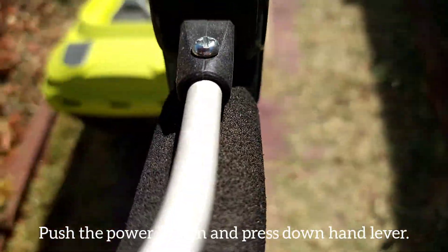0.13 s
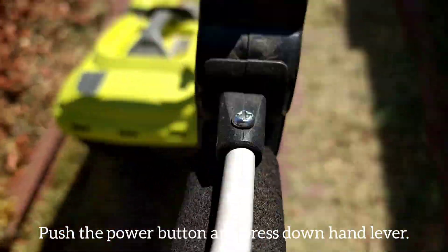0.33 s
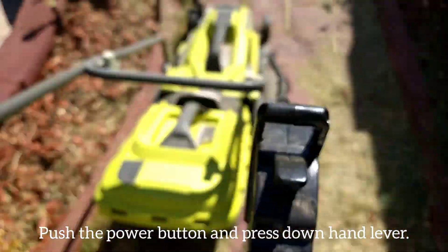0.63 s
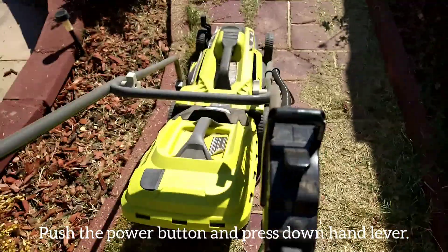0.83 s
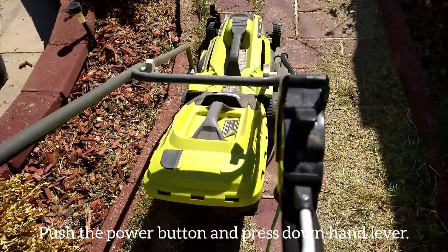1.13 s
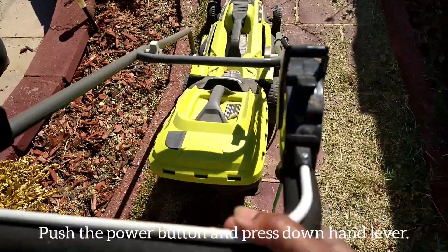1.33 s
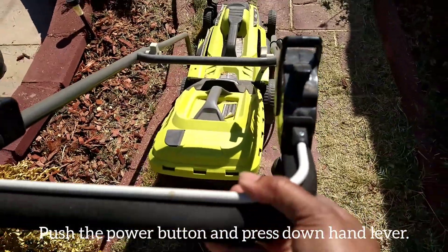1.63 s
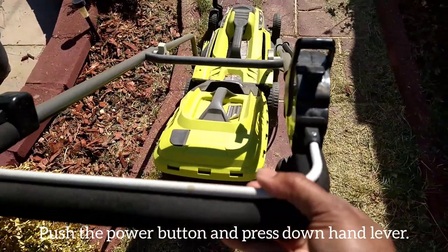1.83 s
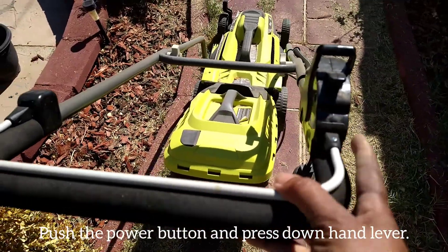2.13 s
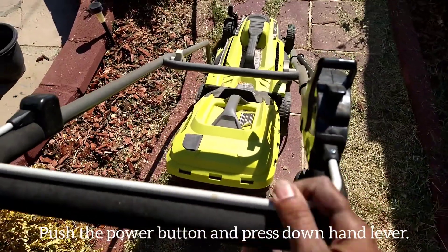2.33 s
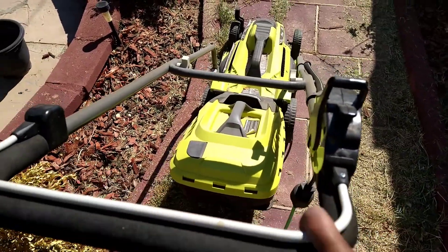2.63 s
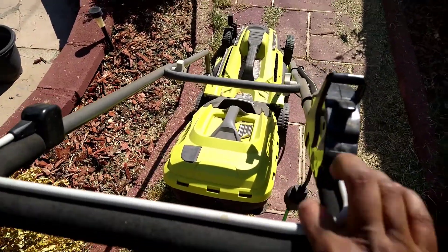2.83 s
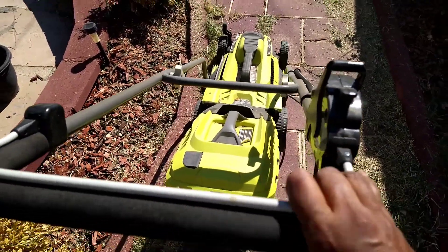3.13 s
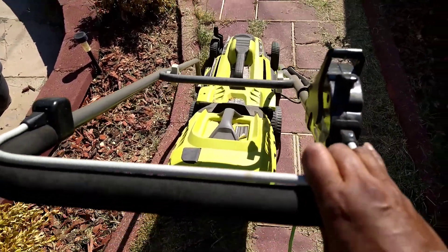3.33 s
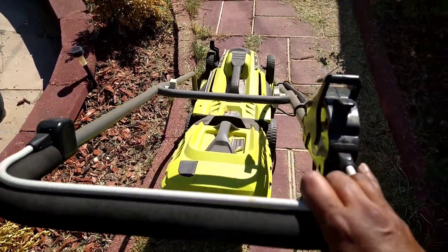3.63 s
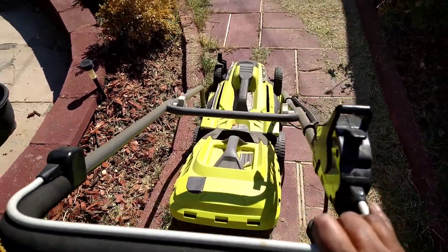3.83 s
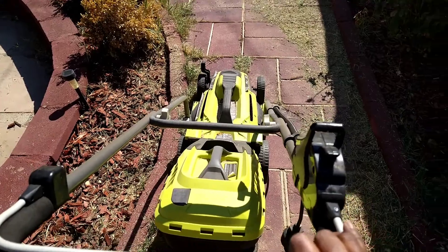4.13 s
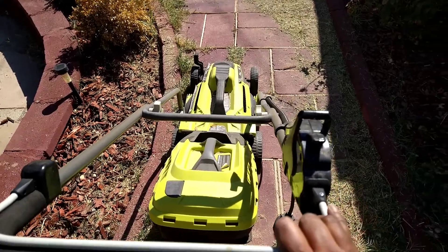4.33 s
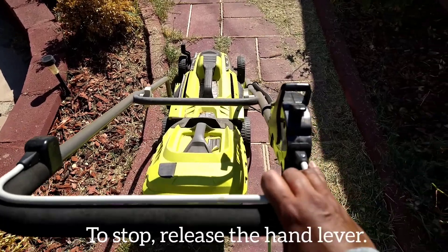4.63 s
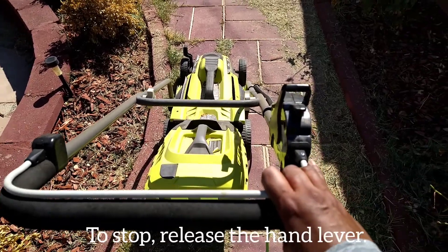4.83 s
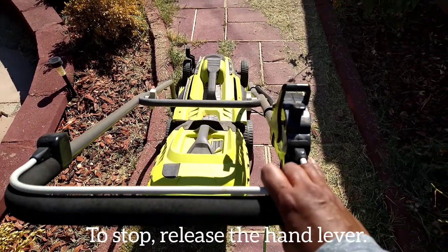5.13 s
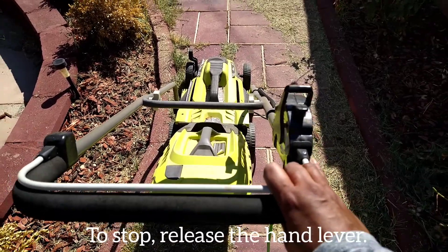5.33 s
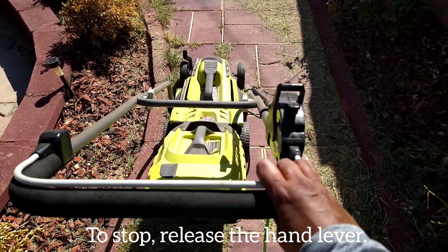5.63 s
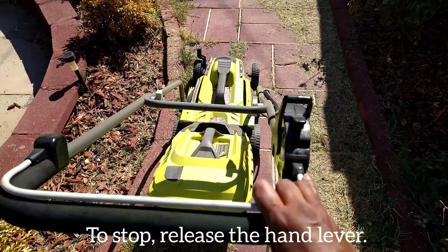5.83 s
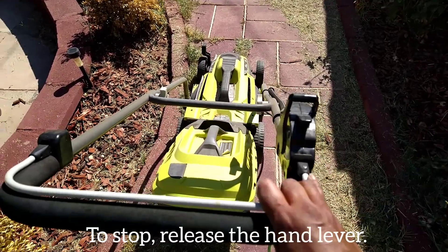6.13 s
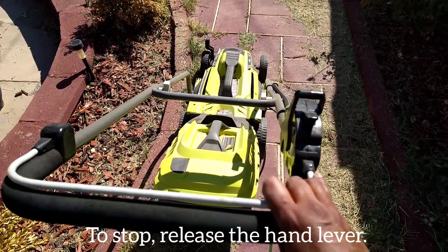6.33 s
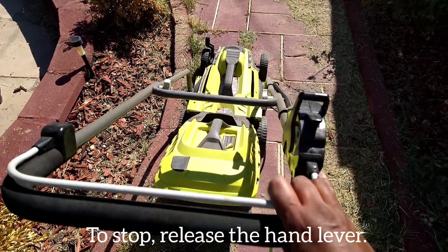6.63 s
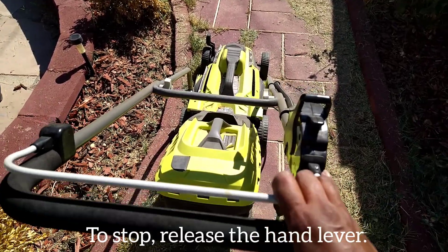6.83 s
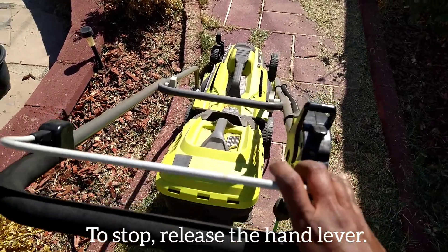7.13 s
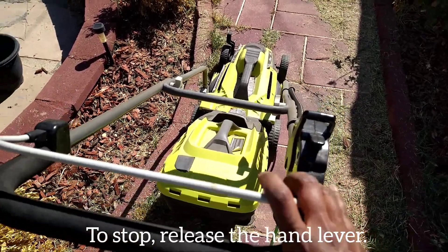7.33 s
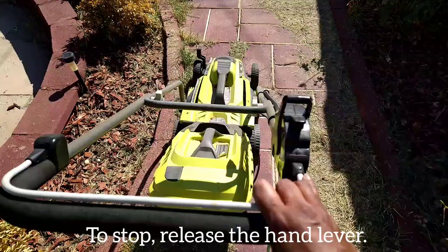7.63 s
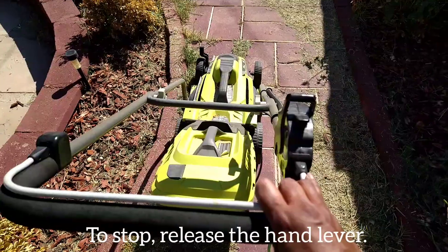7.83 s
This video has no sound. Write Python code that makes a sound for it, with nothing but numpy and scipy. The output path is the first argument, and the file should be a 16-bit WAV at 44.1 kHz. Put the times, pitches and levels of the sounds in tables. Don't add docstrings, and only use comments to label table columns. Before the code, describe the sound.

Outdoors on paving, a small electric lawn mower is heard close from the handle in stereo. At 0 s it is already spinning, rising the last bit to full speed within about a second. It then holds a steady, fast drone: motor hum and low blade beating near 120 Hz, turbulent roar and hiss, a shrill belt whine and a thin steel ring near 3.9 kHz. Timbre and balance shift as the microphones move; from 3 to 5.7 s it is somewhat softer. Dry plastic ticks fall around 1.1, 1.5, 1.65 and 3.7 s, fainter later. At 5.7 s the sound cuts hard for nearly a quarter second, then returns quickly, fuller. At 6.93 s the lever springs open with a sharp double clack; the motor coasts, pitch sinking, whine and ring fading. A second dropout comes at 7.57 s, lasting until about 7.78 s.

```python
import sys
import numpy as np
from scipy import signal
from scipy.io import wavfile
from scipy.ndimage import uniform_filter1d

SR = 44100
rng = np.random.default_rng(int(sys.argv[2]) if len(sys.argv) > 2 else 0)


def transcribe(u):
    v = np.clip(np.atleast_2d(u).T, -1, 1)
    q = np.round(v * 32767).astype(np.int16)
    wavfile.write(sys.argv[1], SR, q)


def volts_from_db(level):
    exponent = np.asarray(level, float) / 20
    return 10 ** exponent


N = 352359


def read(points, hz):
    f, value = np.transpose(points)
    return np.interp(np.log(hz + 1), np.log(f + 1), value)


def curves(table, t):
    s, *columns = np.transpose(table)
    return [np.interp(t, s, c) for c in columns]


def evened(x):
    return x / np.sqrt(np.mean(abs(x) ** 2) + 1e-20)


def drift(rate_hz):
    t = np.arange(0, N + 256, 256) / SR
    slow = 0
    for f in np.geomspace(rate_hz / 8, rate_hz, num=16):
        slow = slow + np.sin(2 * np.pi * (f * t + rng.random())) / np.sqrt(f)
    return np.interp(np.arange(N) / SR, t, evened(slow))


def tone(turns, db, waver_db, blur_rad, rate_hz):
    angle = 2 * np.pi * (turns + rng.random()) + blur_rad * drift(rate_hz)
    return np.sqrt(2) * volts_from_db(db + waver_db * drift(rate_hz)) * np.exp(1j * angle)


def placed(z, pan_db, lead_rad):
    half = volts_from_db(pan_db / 2) * np.exp(.5j * lead_rad)
    mean_power = (abs(half) ** 2 + abs(half) ** -2) / 2
    return np.array([z * half, z / half]).real / np.sqrt(mean_power)


def resonate(x, hz, width_hz):
    turn = np.exp(2j * np.pi * np.cumsum(hz * np.ones(N)) / SR)
    r = np.exp(-np.pi * width_hz / SR)
    return turn * signal.lfilter([1 - r], [1, -r], x / turn)


# t/s, f/Hz
SPEED = [(0, 333.7), (1, 334.2), (1.5, 334.5), (2.3, 335.9), (3.25, 335.8), (4, 334.8), (4.6, 334.7),
         (5.7, 333.3), (5.95, 331.6), (6.94, 330.8), (7.78, 331.75)]
START_SHORT_HZ, SPIN_UP_S = 18.8, .31
COAST_FROM_S, DRAG_PER_S, DRAG_POWER = 6.938, .66, .4


def shaft(t):
    running = curves(SPEED, t)[0] - START_SHORT_HZ * np.exp(-t / SPIN_UP_S)
    free_s = np.maximum(t - COAST_FROM_S, 0) * (t < GAPS[1][1] - .1)
    slowed = (1 + DRAG_POWER * DRAG_PER_S * free_s) ** (-1 / DRAG_POWER)
    return running * slowed, np.log2(slowed)


# t/s, distance level/dB, farness [0-1], paving echo delay/ms,
# turn of the pair [0-1], aim at the deck [0-1]
STANCE = [(0, -1.6, 0.03, 2.77, 0.3, 0.03), (.4, -0.45, 0.02, 3.7, 0.25, 0), (.7, 0.6, .05, 3.7, 0.5, 0.7),
          (1.15, 0, 0, 3.6, 0.25, 0.67), (1.5, 0, 0.24, 3.4, 0.04, 0.44), (2, 0.5, 0.4, 2.66, 0, 0.45),
          (2.5, 0.5, 0.24, 2.8, 0, 0.62), (2.85, -1, 0.45, 2.4, 0, 0.5), (3.05, -2, 0.69, 2.5, 0, 0.6),
          (3.35, -2, 0.93, 1.9, 0, 0.7), (3.7, -4, 0.78, 1.3, 0.6, 0.52),
          (4.2, -4.5, 0.77, 0.55, 0.5, 0.52), (4.8, -5.5, 0.72, 1.47, 1.05, .2), (5.7, -6, .6, 1, 1, 0.06),
          (5.95, 0.4, 0.43, 2.2, 0.5, 0.28), (6.95, 0.2, 0.34, 2.74, 0.68, 0.12),
          (7.57, 0.9, 0.63, 3, 0.9, 0), (7.78, -0.2, 0.39, 2.4, 0.55, 0)]
LOAD_S = 0.8


def level(layer, t):
    db, share, strain_db, per_octave_db, aimed_db = layer
    lost_db, *_, aim = curves(STANCE, t)
    strain_db = strain_db * np.exp(-(t / LOAD_S) ** 2)
    return db + share * lost_db + strain_db + per_octave_db * shaft(t)[1] + aimed_db * aim


ECHO, AIR_ECHO, ECHO_TOP_HZ = 0.2, 0.1, 1200


def paving(hz, t, strength):
    g = np.clip(strength, 0, .9) / (1 + (hz / ECHO_TOP_HZ) ** 4)
    delay_s = curves(STANCE, t)[2] / 1000
    return 10 * np.log10((1 + g ** 2 + 2 * g * np.cos(2 * np.pi * hz * delay_s)) / (1 + g ** 2))


LEADS = [(-2, 0.8), (0, 1.3), (0.8, 1.28)]


def pair_lead(row, t):
    start, growth = LEADS[row]
    return start + growth * curves(STANCE, t)[3]


POWER_OFF_S = 6.95


def current_off_db(t):
    return -9 * np.clip((t - POWER_OFF_S) / .04, 0, 1) * (t < GAPS[1][0])


# level/dB, share of distance loss, start strain/dB, speed law/dB per octave, aim/dB
HUM = (-26, 0.86, 0, -5.2, 0.9)
SHAFT_ORDERS = (2, 13, 15)
MOTOR_ORDERS = (-15, -30.5, -37)


def shaft_hum(t, hz, turns):
    hum_db = level(HUM, t) + paving(hz, t, ECHO)
    hum = tone(turns, hum_db, 0.25, 0.54, 8.1)
    for order, db in zip(SHAFT_ORDERS, MOTOR_ORDERS):
        hum += tone(order * turns, hum_db + db, 3.3, 0.31, 19)
    return placed(hum, .8, -0.37)


BRUSHES = (-38.5, 1.3, 3.5, -5, -2.5)
SIZZLE = (-37.5, 1.5, 10.5, 13, -8.5)
BARS, SIZZLE_WIDTH_HZ = 16, 1500


def commutator(t, hz, turns):
    bars = tone(BARS * turns, level(BRUSHES, t) + 1 + current_off_db(t), 0.68, .5, 21)
    sizzle = evened(resonate(rng.standard_normal((2, N)), BARS * hz, SIZZLE_WIDTH_HZ).real)
    return placed(bars, .6, pair_lead(0, t)) + volts_from_db(level(SIZZLE, t)) * sizzle


# t/s, level/dB, L-R/dB
WHINE = [(0, -40, 13), (.15, -28, 9), (.35, -37, 2), (1, -39, 10), (1.4, -41.5, 18), (1.8, -36, 14),
         (2.4, -39.5, 13), (2.85, -34.5, 14), (3.1, -43, 2), (3.3, -42, -10), (3.6, -29.5, 7),
         (4.2, -32.5, 13), (4.6, -36, -3), (5.05, -32.5, -13.5), (5.7, -28.5, 1.5), (5.95, -27.5, 3.5),
         (6.9, -27.5, -8), (7.78, -27.5, 2.5)]
WHINE_STEPS = (-4, -3, -2, -1, 1, 2, 3, 4)
WHINE_SIDES = (-15, -14.5, -27, -26.5, -11, -8, -19.5, -11.5)
TEETH, PASS_PER_TURN = 22, .3655
WHINE_PER_OCT_DB = 33
WHINE_OFF_SHARE = .75


def belt_whine(t, turns):
    whine_db, pan_db = curves(WHINE, t)
    whine_db = whine_db + WHINE_PER_OCT_DB * shaft(t)[1]
    off_db, lead = current_off_db(t), pair_lead(1, t)
    whine = tone(TEETH * turns, whine_db + WHINE_OFF_SHARE * off_db - .6, 0.88, .3, 25)
    sides_db = -34.5 + 0.22 * (whine_db + 25.5) + off_db
    sides = 0
    for k, db in zip(WHINE_STEPS, WHINE_SIDES):
        sides = sides + tone((TEETH + k * PASS_PER_TURN) * turns, db + sides_db, 1.2, 0.27, 7.5)
    return placed(whine, pan_db, lead) + placed(sides, 0.4 * pan_db, .5 * lead)


def motor(t, hz):
    turns = np.cumsum(hz) / SR
    return shaft_hum(t, hz, turns) + commutator(t, hz, turns) + belt_whine(t, turns)


MULTIPLES = (1, 2, 3, 4, 7)
# level/dB, share of distance loss, start strain/dB, speed law/dB per octave, aim/dB
BEATS = [
    (-27, 1.66, 2, 26, -6.5),
    (-29.5, 1.5, 10, 17, 1.5),
    (-25.5, 0.77, 2, 9.2, -2),
    (-27.5, 0.68, -14.5, 47, -2.2),
    (-37, 3.2, 4.5, 0.091, -11.5),
]
UPPER = (.5, 4.5, 5, 6, 8, 9, 11, 13.33)
UPPER_DB = (-28.5, -14, -6, -16, -18, -22, -22, -26)


def blade_beats(t, shaft_hz, passes):
    def heard_db(layer, multiple):
        return level(layer, t) + paving(multiple * PASS_PER_TURN * shaft_hz, t, ECHO)

    thump = tone(passes, heard_db(BEATS[0], MULTIPLES[0]), 0.23, .1, 6)
    beat = 0
    for k, layer in zip(MULTIPLES[1:], BEATS[1:]):
        beat = beat + tone(k * passes, heard_db(layer, k) - .6, 0.53, 0.24, 16)
    for k, db in zip(UPPER, UPPER_DB):
        beat = beat + tone(k * passes, heard_db(BEATS[3], k) + db, 2.8, 0.22, 14)
    return placed(thump, -.3, 0.55) + placed(beat, -.4, -.1)


# t/s, level/dB, L-R/dB
RING = [(0, -25.5, 8), (.3, -24, 3.5), (.6, -27.5, -3.5), (1.2, -28.5, 11.5), (1.55, -23, 1.5),
        (2.1, -24.5, -6), (2.8, -24, 6.5), (3.3, -27, -2), (3.8, -28.5, -37), (4.1, -25.5, -19.5),
        (4.6, -33, 6.5), (5.3, -37.5, 1.5), (5.7, -34.5, 4.5), (5.95, -32.5, 6), (6.3, -27.5, 13),
        (6.9, -28.5, 12), (7.57, -25, 13.5), (7.78, -31, -0.5)]
RING_STEPS = (-3, -2, -1, 1, 2, 3, 4)
RING_SIDES = (-25, -23, -19, -13, -21, -25, -27)
# width/Hz, level/dB re the ring
HUMPS = [(90, -12.5), (330, -7.5), (900, -9.5)]
RING_HOLD_OCT, RING_PER_OCT_DB = .14, 85
TWIN_HZ, TWIN_DB = -57, -13


def blade_ring(t, shaft_hz, passes):
    ring_db, pan_db = curves(RING, t)
    ring_db = ring_db + RING_PER_OCT_DB * np.minimum(shaft(t)[1] + RING_HOLD_OCT, 0)
    hz = 3890 + .9 * (shaft_hz - 335)
    turns = np.cumsum(hz) / SR
    ring = tone(turns, ring_db - 0.75, .7, 0.5, 25)
    ring += tone(turns + TWIN_HZ * t, ring_db + TWIN_DB, 3, .9, 25)
    sides = 0
    for k, db in zip(RING_STEPS, RING_SIDES):
        sides = sides + tone(turns + k * passes, ring_db + db, 0.67, 0.31, 18)
    noise = rng.standard_normal((2, N))
    noise[1] = .6 * np.roll(noise[0], -19) + .8 * noise[1]
    halo = 0
    for width_hz, db in HUMPS:
        once = resonate(noise, hz, width_hz).real
        halo = halo + volts_from_db(ring_db + db) * evened(resonate(once, hz, width_hz).real)
    return placed(ring, pan_db, pair_lead(2, t)) + placed(sides, .3 * pan_db, .3) + halo


# f/Hz, level/dB per Hz
NEAR = [(40, -20), (110, -21), (170, -0.5), (300, 3), (600, -11.5), (1000, -14.5), (2300, -16.5),
        (3300, -16), (5800, -16), (8300, -13), (9500, -22.5), (11000, -24.5), (13600, -25.5),
        (15700, -30.5)]
# f/Hz, level/dB per Hz
FAR = [(40, -37.5), (110, -28), (170, -13.5), (300, -1.5), (650, 3), (1200, -12), (2200, -23.5),
       (3300, -38), (6200, -23), (7400, -19.5), (8500, -25), (11000, -30), (13600, -30.5), (15700, -43)]
# f/Hz, width/Hz, level/dB at most
DECK = [(956, 160, -16.5), (1820, 70, -7), (1840, 48, 20.5), (2150, 49, 7), (2220, 80, -10), (2940, 76, 13),
        (4170, 200, -13)]
# f/Hz, width/Hz, level/dB per octave of speed
BELT_HISS = (7700, 600, 12)
# f/Hz, width/Hz, level/dB
NOTCH = (1150, 130, -2.5)
# lower f/Hz, upper f/Hz
AIR_BANDS = [(130, 800), (850, 1400), (1500, 6800), (8000, 15000)]
# level/dB, share of distance loss, start strain/dB, speed law/dB per octave, aim/dB
RUSH = [
    (-25, 0.94, -0.3, 7.9, .2),
    (-27.5, .9, 4.5, 12.6, .2),
    (-23.5, 0.54, -5.5, 9, 0.7),
    (-33, 0.84, -1.5, 17, 3.5),
]
FAR_DULL_DB = (3.1, -8, -1, -8.5)


def air_spectrum(hz, t):
    _, far, _, _, aim = np.clip(curves(STANCE, t), 0, 1)
    hz = hz[:, None]

    def bump(at_hz, width_hz):
        return np.exp(-((hz - at_hz) / width_hz) ** 2)

    shape = read(NEAR, hz) * (1 - far) + read(FAR, hz) * far
    shape += 5 * bump(13600, 600) - (7 - 5 * far) * bump(11100, 400)
    for at_hz, width_hz, db in DECK:
        shape += db * far * aim * bump(at_hz, width_hz)
    shape += BELT_HISS[2] * shaft(t)[1] * bump(*BELT_HISS[:2])
    shape += NOTCH[2] * bump(*NOTCH[:2])
    lifts = []
    for layer, dull_db, (lo, hi) in zip(RUSH, FAR_DULL_DB, AIR_BANDS):
        inside = (hz[:, 0] > lo) & (hz[:, 0] < hi)
        band_power = (volts_from_db(shape[inside]) ** 2).sum(0)
        lifts.append(level(layer, t) + dull_db * far - 10 * np.log10(band_power))
    centres = np.log([np.sqrt(lo * hi) for lo, hi in AIR_BANDS])
    for one, lift_db in zip(np.eye(4), lifts):
        shape += np.interp(np.log(hz + 1), centres, one) * lift_db
    return shape + paving(hz, t, AIR_ECHO)


# f/Hz, lead of the left/rad
LEAD = [(0, 0), (600, -0.2), (1030, -0.7), (1380, 0.2), (1810, -4.9), (2150, -5.8), (2760, -7.0),
        (4050, -12.4), (6890, -17.7), (9220, -25.6), (10900, -28.4), (11600, -30.7), (14800, -41.3),
        (15300, -43.9)]
# f/Hz, likeness [0-1]
SAME = [(60, .9), (300, .97), (600, .8), (1000, .2), (1700, .45), (2400, .9), (3500, .65), (7000, .7),
        (9900, .25), (12000, .55), (14500, .55), (15500, .95)]
# f/Hz, L-R/dB
LEFT = [(60, -6.5), (99, 8), (160, 4.5), (270, -5), (450, 0.5), (740, -3), (1220, -2), (2010, -5.5),
        (3330, 9.5), (5500, -1), (9080, 2.5), (15000, 3)]


def air(passes):
    frames, hz = N // 256 + 5, np.fft.rfftfreq(1024, 1 / SR)
    t = np.arange(frames) * 256 / SR
    turn = np.clip(curves(STANCE, t)[3], 0, 1)
    a, b, c, d, patches = rng.standard_normal((frames, 513, 5)).T
    patches = uniform_filter1d(uniform_filter1d(patches, 8, axis=0), 30, axis=1)
    right, other = a + 1j * b, c + 1j * d
    same = np.clip(read(SAME, hz), -1, 1)[:, None]
    lead = np.interp(hz, *np.transpose(LEAD))[:, None] * (1.03 - .09 * turn)
    z = np.array([right * np.exp(1j * lead), same * right + np.sqrt(1 - same ** 2) * other])
    tilt = volts_from_db(read(LEFT, hz) / 2)[:, None]
    z *= np.array([tilt, 1 / tilt]) * volts_from_db(air_spectrum(hz, t) + 1.58 * evened(patches) + 0.55)
    low = (1 / (1 + (hz / 1200) ** 4))[:, None]
    roar = signal.istft(z * low, nperseg=1024, noverlap=768)[1][:, :N]
    hiss = signal.istft(z * (1 - low), nperseg=1024, noverlap=768)[1][:, :N]
    throb = 0.055 * np.cos(2 * np.pi * passes)
    throb += 0.092 * np.cos(4 * np.pi * passes + 2.6)
    throb += 0.085 * np.cos(6 * np.pi * passes + 0.88)
    return roar * (1 + 0.38 * throb) + hiss * (1 + throb)


# t/s, peak level/dB, brightness f/Hz, L-R/dB
TICKS = [(1.0559, -11, 9020, 5), (1.4526, -16.5, 9120, 10.5), (1.65, -8.5, 8900, 1.5),
         (2.4262, -22, 8970, 4.5), (3.649, -16.5, 8880, -2.2), (3.683, -13.5, 6000, 6.5),
         (3.717, -21.5, 8660, 6.5), (3.766, -22, 11000, 12.5), (3.8999, -23, 11000, -3.5),
         (5.189, -24, 9000, -3.5), (5.3536, -23.5, 9040, -5.5), (5.5666, -19, 8930, -4.5),
         (6.4506, -24, 8950, -1), (6.713, -15, 8770, 4.5)]
LEVER = [
    (6.9327, -8, 11000, 3),
    (6.9336, -3, 5200, 3),
    (6.9385, -13, 5000, 1),
    (6.9499, -1.5, 5200, -1),
    (6.9503, -8, 900, -1),
    (6.954, -8, 1800, -1),
    (6.9565, -10, 4000, -1),
]


def ticks():
    out, t = np.zeros((2, N)), np.arange(600) / SR
    r = np.exp(-np.pi * 3500 / SR)
    for s, db, hz, pan_db in TICKS + LEVER:
        noise = rng.standard_normal(600)
        mode = [1, -2 * r * np.cos(2 * np.pi * hz / SR), r * r]
        puff = evened(signal.lfilter([1, 0, -1], mode, noise))
        snap = volts_from_db(db - 4 - 60 * t / .013) * puff * np.minimum(t / .0006, 1)
        at = round(s * SR)
        out[0, at + 1:at + 601] += snap * volts_from_db(pan_db / 2)
        out[1, at:at + 600] += snap / volts_from_db(pan_db / 2)
    return out


def scene():
    t = np.arange(N) / SR
    shaft_hz = shaft(t)[0]
    passes = PASS_PER_TURN * np.cumsum(shaft_hz) / SR
    blade = blade_beats(t, shaft_hz, passes) + blade_ring(t, shaft_hz, passes)
    return motor(t, shaft_hz) + blade + air(passes) + ticks()


# t/s out, t/s back in
GAPS = [
    (5.7075, 5.9475),
    (7.5675, 7.7805),
]
FADE_IN_S = (-.006, -.005, 0, .003, .03, .12)
FADE_IN = (0, .06, .08, .45, .7, 1)
TREBLE_HZ, TREBLE_FADE = 8500, 2.5


def dropouts(heard):
    t, gate = np.arange(N) / SR, np.ones(N)
    for out_s, in_s in GAPS:
        trace = volts_from_db(-48 - 7500 * np.maximum(t - out_s, 0)) * (t < out_s + .016)
        rise = np.interp(t - in_s, FADE_IN_S, FADE_IN)
        gate *= np.where(t < out_s, 1, np.maximum(trace, rise))
    top = signal.sosfiltfilt(signal.butter(2, TREBLE_HZ, "high", fs=SR, output="sos"), heard)
    return (heard - top) * gate + top * gate ** TREBLE_FADE


def top_cut(x):
    return signal.sosfilt(signal.butter(12, 15730, fs=SR, output="sos"), x)


def record(dry):
    heard = signal.sosfilt(signal.butter(3, 52, "high", fs=SR, output="sos"), dry)
    heard = dropouts(heard)
    edge = signal.firwin(255, 15700, window=("kaiser", 9), fs=SR)
    mix = signal.oaconvolve(heard, edge[None], "same")
    return top_cut(mix)


dry = scene()
out = record(dry)
transcribe(out)
```